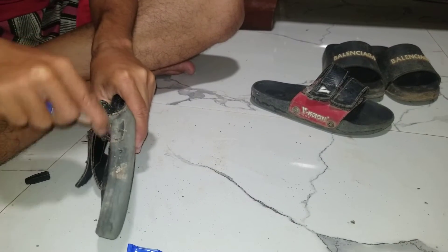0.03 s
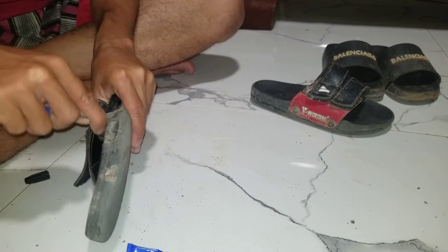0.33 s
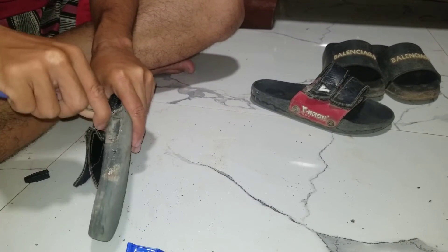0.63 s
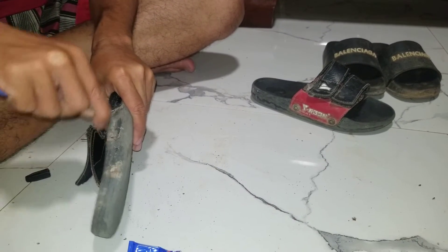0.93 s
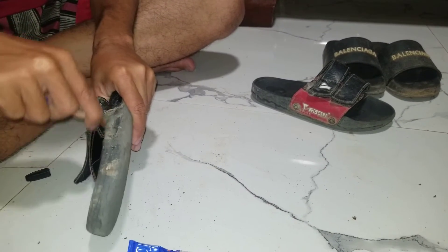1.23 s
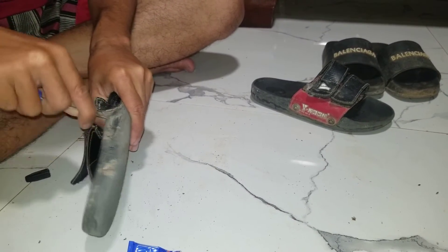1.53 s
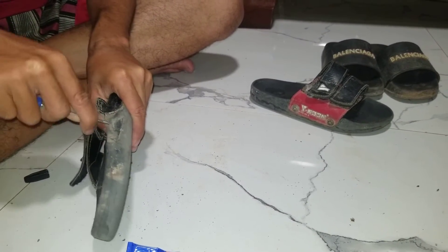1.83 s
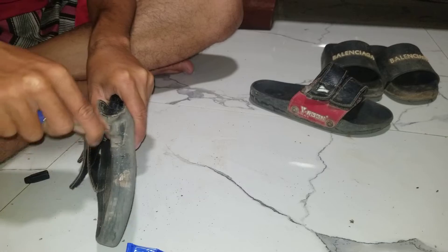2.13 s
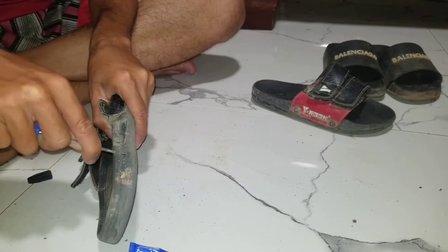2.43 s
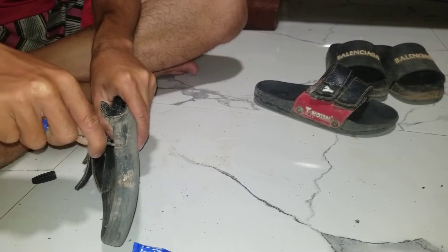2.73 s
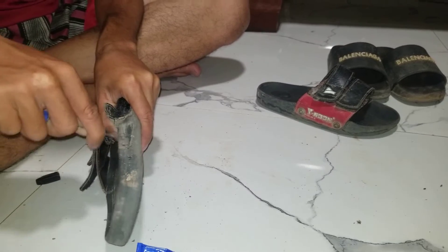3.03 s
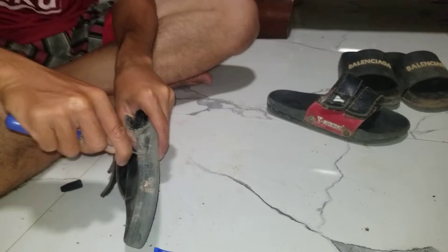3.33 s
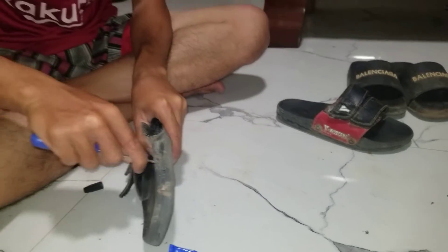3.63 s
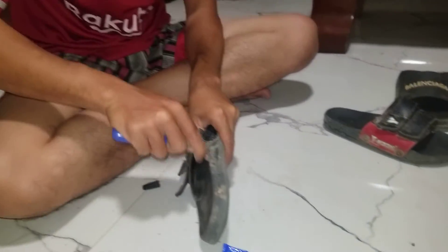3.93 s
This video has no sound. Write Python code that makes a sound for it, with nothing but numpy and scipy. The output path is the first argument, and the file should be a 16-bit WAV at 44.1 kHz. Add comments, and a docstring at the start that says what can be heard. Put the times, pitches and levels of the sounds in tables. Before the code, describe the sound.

Short gritty scrapes, ticks and sharp snaps come from a tool picking at a sandal strap near the microphone. Soft rubbing and hand bumps lie between, with one hard rubber slap late on, in a slightly echoing, faintly humming room.

```python
"""Soft rubbing and short scrapes, very close: fingers hold a rubber sandal on a tiled floor while a small
hand tool picks at its strap. The tip sticks, slips and snaps free, each time setting off the dull sole,
the tool's thin ring and a bright crack. Hands bump the sole, and the rubber slaps back twice, faintly
and then hard. The hard room rings after every snap, over a low wavering hum and faint hiss."""
import sys
import numpy as np
from scipy import signal
from scipy.fft import rfft, irfft
from scipy.io import wavfile
from scipy.ndimage import uniform_filter1d

SR = 44100
rng = np.random.default_rng(int(sys.argv[2]) if len(sys.argv) > 2 else 0)


def to_wav(sig):
    """Store sig (one row per channel, or 1-D mono) as 16-bit WAV at the path in sys.argv[1].

    Samples outside -1..1 are clipped; the rate is SR.
    """
    pcm = np.clip(np.atleast_2d(sig), -1, 1) * 32767
    pcm = np.round(pcm).astype(np.int16)
    wavfile.write(sys.argv[1], SR, pcm.T)  # frames by channels


N = 176400
TOP_HZ = 16000
BODY_LOW_HZ = 157  # the close sound and the room's answer carry nothing below this


def undb(db):
    """Decibels to gain."""
    return 10 ** (np.asarray(db) / 20)


def unit(x):
    """Scale to unit energy."""
    return x / np.sqrt(np.sum(x ** 2, axis=-1, keepdims=True) + 1e-20)


def pan(db):
    """Stereo gains of mean power one, from left minus right in dB."""
    gains = undb(np.array([[db], [-db]]) / 2)
    return gains / np.sqrt(np.mean(gains ** 2))


def on_log(points, hz):
    """Read a table along a log-frequency axis."""
    freqs, values = np.array(points).T
    return np.interp(np.log(hz + 1), np.log(freqs), values)


def colour(x, points):
    """EQ a sound with a curve."""
    n = x.shape[-1]
    return irfft(rfft(x) * undb(on_log(points, np.fft.rfftfreq(n, 1 / SR))), n)


def walk(rate_hz):
    """Smooth random drift of unit spread."""
    hold = int(SR / rate_hz)
    steps = np.repeat(rng.standard_normal(N // hold + 1), hold)
    drift = uniform_filter1d(steps, hold)[:N]
    return drift / drift.std()


def add(track, start, x):
    """Mix a sound in at a time in seconds."""
    i = max(0, int(start * SR))
    n = max(0, min(x.shape[-1], N - i))
    track[..., i:i + n] += x[..., :n]


def through(x, response):
    """Convolve with a response, channel by channel."""
    return signal.fftconvolve(np.atleast_2d(x), response, axes=-1)[:, :N]


def ring(modes, size=2048):
    """A struck body: damped sines of alternating polarity."""
    t = np.arange(size) / SR
    out = np.zeros(size)
    for k, (hz, db, t60) in enumerate(modes):
        mode = np.sin(2 * np.pi * hz * t) * np.exp(-np.log(1000) * t / t60)
        out += (-1) ** k * undb(db) * unit(mode)
    return unit(out)


def click(points, size=2048):
    """A minimum-phase click with a given spectrum."""
    spectrum = undb(on_log(points, np.fft.rfftfreq(size, 1 / SR)))
    cepstrum = irfft(np.log(spectrum))
    cepstrum[1:size // 2] *= 2
    cepstrum[size // 2 + 1:] = 0
    return unit(irfft(np.exp(rfft(cepstrum))))


def near(response, pan_db, scatter_db=-6.5, scatter_s=.0012, right_lag_s=.00015):
    """Close stereo perspective: the direct path plus scatter off hands and floor."""
    t = np.arange(len(response)) / SR
    paths = undb(scatter_db) * unit(rng.standard_normal((2, len(t))) * np.exp(-t / scatter_s) * t)
    paths[0, 0] += 1
    paths[1, int(right_lag_s * SR)] += 1
    return unit(through(response, paths)) * pan(pan_db)


def slips(length, per_s, spread_db=6.5, most=2000):
    """Stick-slip friction: uneven impulses that swell and ease with the pressure, at unit energy."""
    count = int(np.clip(length * per_s, 2, most))
    place = rng.random(most)[:count]
    strength = undb(spread_db * np.clip(rng.standard_normal(most)[:count], -2, 2))
    pressure = np.sqrt(np.sin(np.pi * place))
    train = np.zeros(int(length * SR) + 2)
    np.add.at(train, (place * (len(train) - 1)).astype(int), pressure * strength * (-1) ** np.arange(count))
    return unit(train)


def drive(push, layers):
    """Scale a push so that each layer gives out unit energy."""
    heard = signal.fftconvolve(push[None], layers, axes=-1)
    return push / np.sqrt(np.sum(heard ** 2, axis=1, keepdims=True) + 1e-20)


# dull knock of the rubber sole (f/Hz, level/dB, t60/s)
SOLE_KNOCK = [(249, -7, 0.051), (388, -9.5, 0.017), (560, -8, 0.027), (780, -8.5, 0.015), (1190, -1, 0.013),
              (1404, -2.5, 0.014), (2020, -6, 0.0057)]
# thin, short ring of the tool (f/Hz, level/dB, t60/s)
TOOL_RING = [(2950, -10.5, 0.0065), (4000, -5, 0.006), (5310, -2.5, 0.0063), (6164, 0, 0.0025),
             (6580, -2, 0.0083), (7660, -13, 0.0018)]
# spectrum of the bright crack (f/Hz, level/dB)
CRACK_EQ = [(3000, -10), (7000, -18.5), (8600, -6), (9800, -3), (11000, 4), (12000, 3.5), (13300, 0.5),
            (14700, -3.5), (16500, -9)]
def contact_layers():
    """The three layers that friction sets off, always in this order: sole, tool ring, crack."""
    return np.array([ring(SOLE_KNOCK), ring(TOOL_RING), click(CRACK_EQ)])


# finger rubs (t/s, length/s, sole/dB, ring/dB, crack/dB)
RUB_CUES = [(0,0.49,-33,-28,-26.5), (1.016,0.29,-41,-30.5,-29.5), (1.301,.25,-26.5,-28.5,-29),
            (1.681,0.33,-34,-33,-33.5), (2.848,0.11,-47,-38,-34.5), (3.624,0.28,-36,-32,-28)]
def rubs(swell_db=2):
    """Fingers slide softly over the rubber: a fine-grained, wavering force on each layer."""
    force = np.zeros((3, N))
    for start, length, *levels in RUB_CUES:
        add(force, start, undb(levels)[:, None] * slips(length, per_s=2500))
    return force * undb(swell_db * walk(25.22))


# scrapes of the tip, before trim (t/s, length/s, sole/dB, ring/dB, crack/dB)
SCRAPE_CUES = [(0,0.0074,-31,-25.5,-17.5), (0.046,0.027,-26,-19,-15), (0.156,0.022,-59,-35,-27),
               (.174,0.0067,-53,-27,-20), (0.282,0.04,-30.5,-24,-23.5), (.432,.032,-45.5,-33,-27.5),
               (0.57,0.014,-22.5,-26,-23), (0.84,0.012,-41,-36,-32), (0.856,0.014,-47,-28.5,-32),
               (0.972,0.032,-18.5,-18.5,-14), (1.133,0.042,-33,-25,-25.5), (1.225,0.011,-40,-50,-44),
               (1.423,.012,-22,-23,-19), (1.439,0.016,-24,-26,-20), (1.542,0.01,-13.5,-8,-5.5),
               (1.966,.015,-25,-22.5,-13), (2.179,0.0091,-34.5,-24.5,-23), (2.209,0.038,-32.5,-28,-26),
               (2.343,0.025,-44.5,-38,-28), (2.558,0.034,-36,-38,-33.5), (2.727,0.013,-32,-30,-28),
               (3.245,0.0024,-28,-34.5,-56), (3.361,0.0054,-31,-35,-29), (3.4,0.019,-35,-19,-14.5),
               (3.713,0.014,-49,-36,-27), (3.81,.035,-17.5,-12,-16.5)]
def scrapes(layers, trim_db=(0, -3, -3)):
    """The tip drags over the rubber: short, gritty bursts of force."""
    force = np.zeros((3, N))
    for start, length, *levels in SCRAPE_CUES:
        gains = undb(np.add(levels, trim_db))[:, None]
        add(force, start, gains * drive(slips(length, per_s=1200), layers))
    return force


# what the sole throws into the room (f/Hz, level/dB)
SOLE_SEND_EQ = [(100, -21.5), (260, -0.5), (420, -2), (560, 1.5), (820, -3.5), (1400, 3), (2100, -6),
                (2800, -6), (3700, -11), (6000, -15), (16000, -21)]
# what the tool throws into the room (f/Hz, level/dB)
TOOL_SEND_EQ = [(500, -29.5), (1600, -19), (2800, -10.5), (3600, -7), (4600, -3), (5400, -3), (6300, 2),
                (7300, -2.5), (8500, -8.5), (12000, -37.5)]
def room_send(force, send_db=(-.5, -2, -2.5)):
    """The three layers radiate outwards, each with its own tone, into one mono send."""
    thrown = np.array([click(SOLE_SEND_EQ), click(TOOL_SEND_EQ), click(CRACK_EQ)])
    return undb(send_db) @ through(force, thrown)


# decay of the tiled room (f/Hz, t60/s)
ROOM_DECAY = [(150, 0.97), (550, 0.5), (1400, 0.42), (3700, 0.61), (6500, 0.51), (10000, 0.52),
              (16000, 0.15)]
# tone of its tail (f/Hz, level/dB)
ROOM_EQ = [(80, -8), (250, 2), (450, 3), (700, 2.5), (1400, -1), (2200, 3.5), (3000, 3.5), (4400, -2.5),
           (6200, -2.5), (9000, 1.5), (12000, -3), (16000, 12.5)]
def room(level_db=-6, predelay_s=.0035, build_s=.0037, bands=14):
    """Diffuse response of the tiled room: the lows linger and the very top dies first."""
    t = np.arange(SR) / SR
    freqs = np.fft.rfftfreq(SR, 1 / SR)
    noise = rfft(rng.standard_normal((2, SR)))
    centres = np.geomspace(100, TOP_HZ, bands)
    tail = np.zeros((2, SR))
    for hz, weights in zip(centres, np.eye(bands)):
        band = irfft(noise * np.interp(freqs, centres, weights))
        tail += band * np.exp(-np.log(1000) * t / on_log(ROOM_DECAY, hz))
    fade_in = np.clip((t - predelay_s) / build_s, 0, 1)
    return undb(level_db) * colour(unit(tail * fade_in), ROOM_EQ)


# swells and dips of the hum (t/s, level/dB)
HUM_FADER = [(0.0, -69), (0.04, -58), (0.57, -50), (0.73, -70), (0.98, -48.5), (1.04, -69), (1.11, -44.5),
             (1.41, -68.5), (1.48, -49), (2.22, -73.5), (2.25, -57.5), (2.51, -45), (2.55, -82),
             (2.58, -52.5), (2.7, -43.5), (2.83, -74), (2.94, -47.5), (3.55, -57), (3.82, -46), (3.92, -56),
             (3.97, -57), (4.0, -46)]
# its slow pitch drift (t/s, f/Hz)
HUM_GLIDE = [(0, 82.62), (.9, 79.28), (2.15, 80.33), (2.35, 88.83), (2.65, 84.3), (3, 82.07), (3.6, 76.1),
             (4, 75.3)]
def hum(jitter=.03, pan_db=-2.5):
    """A low sine that swells and wavers in pitch."""
    t = np.arange(N) / SR
    hz = np.interp(t, *np.array(HUM_GLIDE).T) * (1 + jitter * walk(20))
    rms = undb(np.interp(t, *np.array(HUM_FADER).T))
    return np.sqrt(2) * rms * np.sin(2 * np.pi * np.cumsum(hz) / SR) * pan(pan_db)


# spectrum of the noise bed (f/Hz, level/dB)
HISS_EQ = [(20, -16), (40, 8), (80, 15), (130, 9), (200, 1), (300, -4), (500, -20.5), (1000, -22.5),
           (2100, -23), (3500, -28.5), (4600, -27.5), (6000, -27), (7400, -22), (8500, -34.5),
           (11500, -22.5), (16000, -19)]
def hiss(rms_db=-57.5):
    """Faint steady rumble and hiss, half of it common to both sides."""
    left, right, common = rng.standard_normal((3, N))
    bed = colour(np.array([left, right]) + common, HISS_EQ)
    return undb(rms_db) * np.sqrt(N) * unit(bed)


# small ticks, before trim (t/s, level/dB)
TICK_CUES = [(0.0425, -27), (0.176, -27.5), (0.3995, -39), (0.865, -32), (0.952, -33), (0.9927, -22),
             (1.098, -34.5), (1.1855, -30), (1.198, -32), (1.2485, -28), (1.263, -32), (1.5195, -23.5),
             (2.1765, -24.5), (2.2075, -22.5), (2.858, -41), (3.095, -28.5), (3.248, -32), (3.3615, -31),
             (3.369, -20), (3.7413, -23.5), (3.7972, -20.5)]
def ticks(trim_db=(-16.5, -10, .5)):
    """Lone slips of the tip: single impulses of force, heard mostly as crack."""
    force = np.zeros((3, N))
    for start, db in TICK_CUES:
        add(force, start, undb(np.add(db, trim_db))[:, None])
    return force


# snaps, before trim (t/s, length/s, sole/dB, ring/dB, crack/dB, sole's extra send/dB)
SNAP_CUES = [(.077,.0009,-18,-9,-14.5,-3), (1.271,.0006,-14.5,-9,-16,0.5), (1.4393,.0008,-19,-12,-16,-17),
             (1.983,0.0016,-21,-15.5,-16.5,4.5), (1.989,0.0014,-17.5,-17,-12,4), (2.928,.0011,-9,0,-2.5,5),
             (3.3845,.0004,-22,-15.5,-10.5,-13), (3.4634,.0013,-13,-4.5,-5.5,-2.5),
             (3.806,.003,-15.5,-9.5,-13,1)]
def snaps(layers, trim_db=(0, 0, 3), slips_per_s=4900, creep_s=.0012, creep_db=-20, skid_db=2.5):
    """The tip creeps, lets go and skids; gives the close force and the single blows the room takes."""
    force, blows = np.zeros((2, 3, N))
    for start, length, *levels, sole_send_db in SNAP_CUES:
        gains = undb(np.add(levels, trim_db))[:, None]
        release = undb(skid_db) * slips(length, slips_per_s)
        release[0] += 1  # the instant of letting go
        add(force, start - creep_s, gains * undb(creep_db) * slips(creep_s, slips_per_s))
        add(force, start, gains * drive(release, layers))
        add(blows, start, gains * undb([[sole_send_db], [0], [0]]))
    return force, blows


# soft thumps of hand on sole (t/s, f/Hz, length/s, level/dB, left minus right/dB)
BUMP_CUES = [(1.224, 72, 0.036, -39.5, -26), (1.263, 149, 0.013, -41, -4), (1.539, 205, 0.0092, -39.5, -4),
             (2.925, 157.1, .016, -41, 0), (3.24, 87.1, 0.016, -35, 21), (3.361, 128, 0.018, -24.5, -18),
             (3.784, 75.5, 0.02, -35, -21), (3.804, 190, 0.0068, -36, -2), (3.817, 79.5, 0.028, -31.5, -35),
             (3.945, 87, 0.045, -37.5, -35)]
def bumps():
    """Each push of the hands gives a few soft, low cycles."""
    out = np.zeros((2, N))
    for start, hz, length, db, pan_db in BUMP_CUES:
        t = np.arange(int(length * SR)) / SR
        thump = np.hanning(len(t)) * np.sin(2 * np.pi * hz * t)
        add(out, start, undb(db) * pan(pan_db) * thump)
    return out


# spectrum of a rubber smack at pitch ratio 1 (f/Hz, level/dB)
SMACK_EQ = [(100, -12), (300, -12), (520, -12), (700, -3), (900, -3.5), (1250, 1.5), (1550, -5.5),
            (2200, -9.5), (3800, -13.5), (5500, -20), (7000, -26), (9500, -24), (11500, -21), (16000, -26)]
# slaps of the rubber (t/s, level/dB, pitch ratio, room send/dB)
SLAP_CUES = [(1.9849, -13, 0.71, -3), (2.9791, -1.5, 1.08, 0)]
def slaps(contact_s=.0017, pan_db=-9):
    """Released rubber smacks back, lower when slack; gives close sound and room send."""
    close, send = np.zeros((2, N)), np.zeros(N)
    for start, db, ratio, send_db in SLAP_CUES:
        smack = click([(hz * ratio, level) for hz, level in SMACK_EQ])
        contact = slips(contact_s, per_s=2000)  # the rubber lands unevenly
        contact[len(contact) // 4] += 1  # the main hit
        add(close, start, undb(db) * near(np.convolve(contact, smack), pan_db))
        add(send, start, undb(db + send_db) * smack)
    return close, send


def scene():
    """Close work on the sandal and the room's answer, over hum and hiss."""
    layers = contact_layers()
    pans_db = (-12, 2.5, 12.5)  # sole right, ring near centre, crack left
    friction = rubs() + scrapes(layers) + ticks()
    snap_force, snap_blows = snaps(layers)
    picking = sum(through(force, near(layer, pan_db))
                  for force, layer, pan_db in zip(friction + snap_force, layers, pans_db))
    smacks, smack_send = slaps()
    reverb = through(room_send(friction + snap_blows) + smack_send, room())
    low_cut = signal.butter(3, BODY_LOW_HZ, "highpass", fs=SR, output="sos")
    return signal.sosfilt(low_cut, picking + smacks + reverb) + bumps() + hum() + hiss()


def record(dry):
    """A steep high cut takes off the very top."""
    return signal.sosfilt(signal.ellip(10, .2, 70, TOP_HZ, fs=SR, output="sos"), dry)


dry = scene()
out = record(dry)
to_wav(out)
```